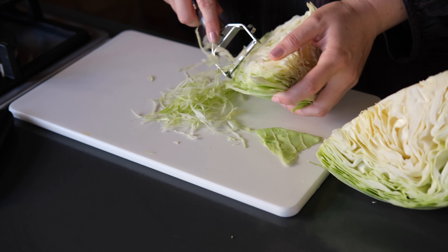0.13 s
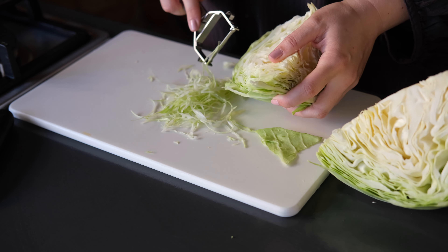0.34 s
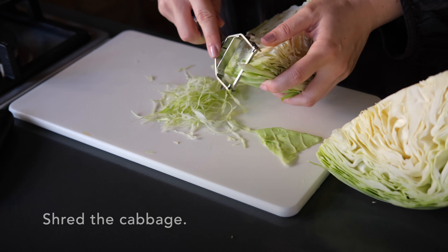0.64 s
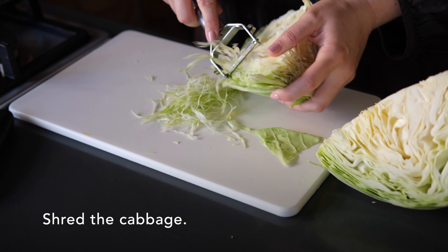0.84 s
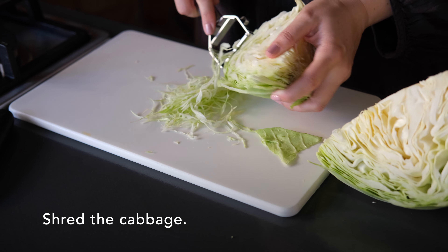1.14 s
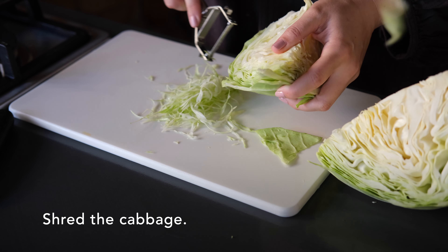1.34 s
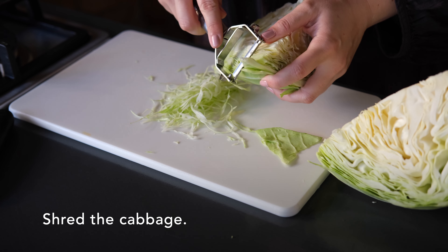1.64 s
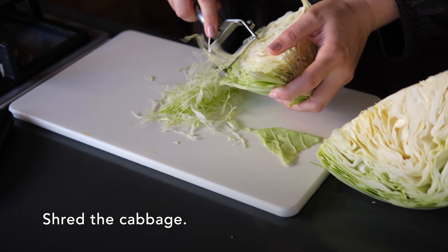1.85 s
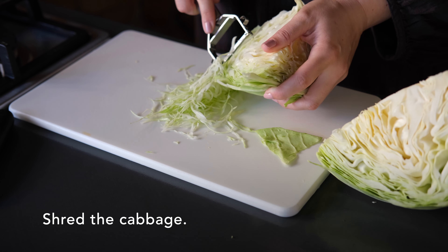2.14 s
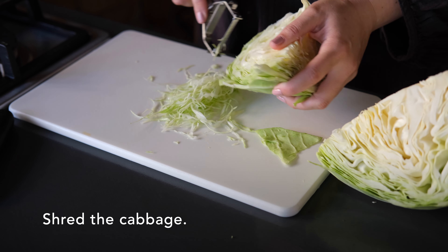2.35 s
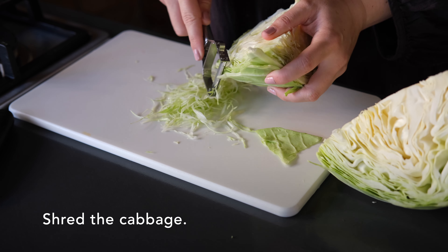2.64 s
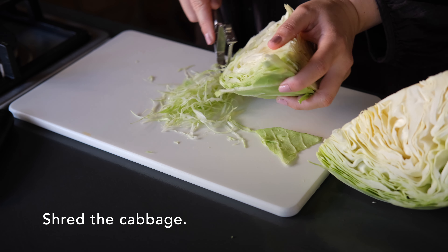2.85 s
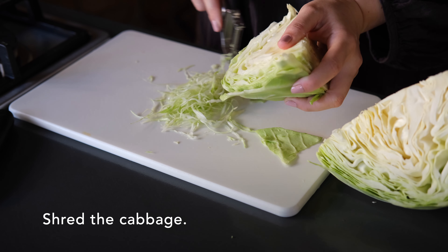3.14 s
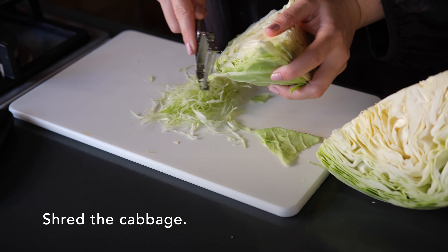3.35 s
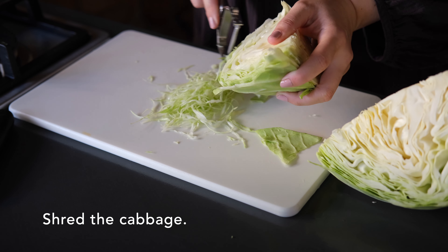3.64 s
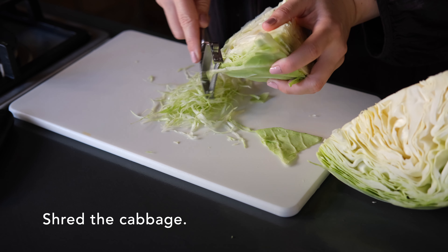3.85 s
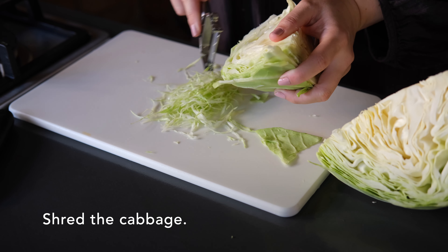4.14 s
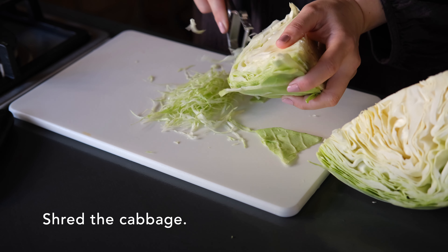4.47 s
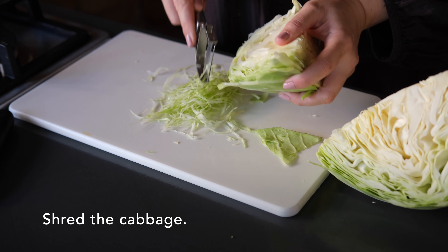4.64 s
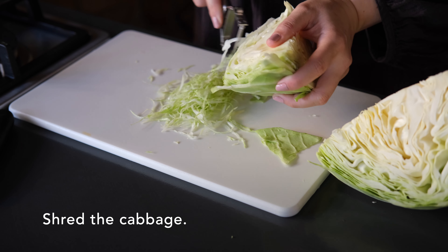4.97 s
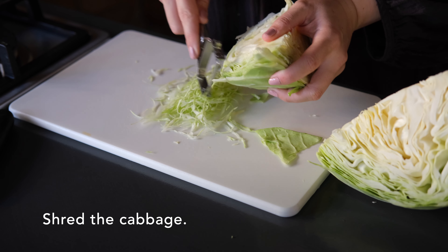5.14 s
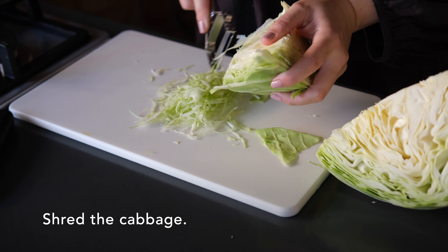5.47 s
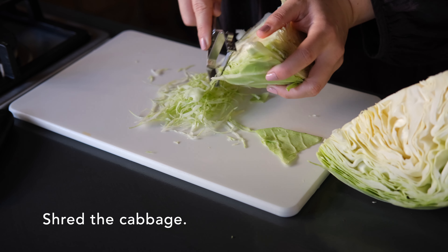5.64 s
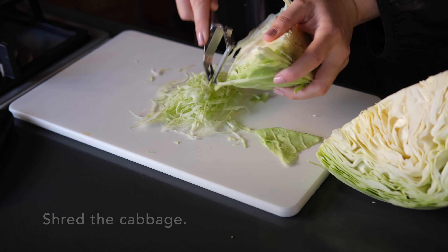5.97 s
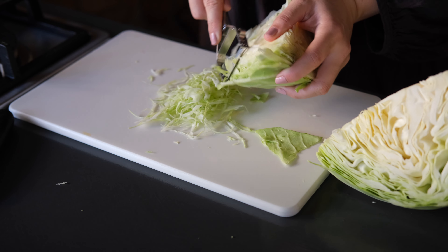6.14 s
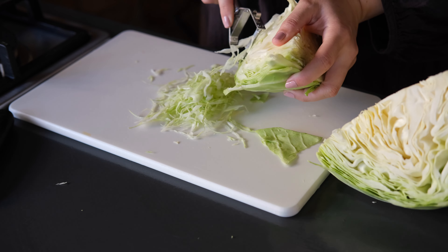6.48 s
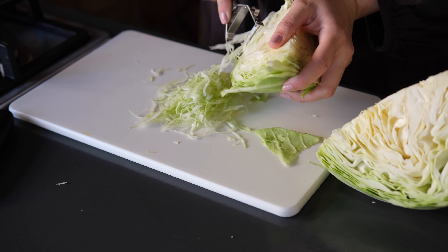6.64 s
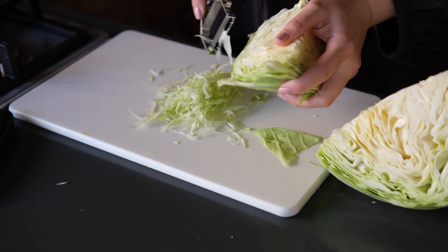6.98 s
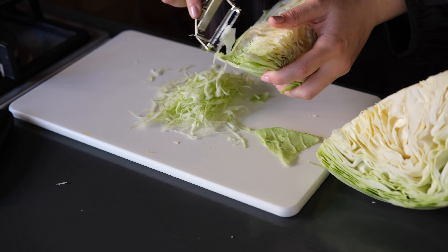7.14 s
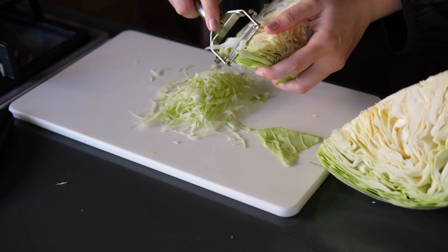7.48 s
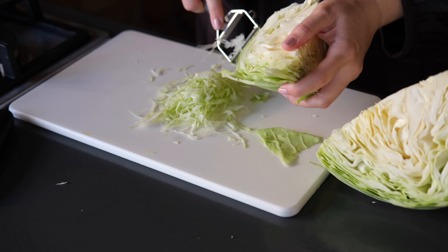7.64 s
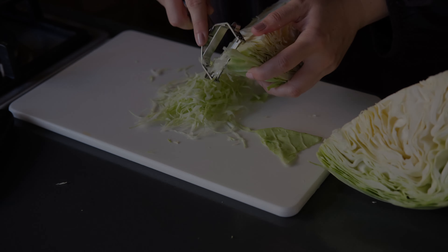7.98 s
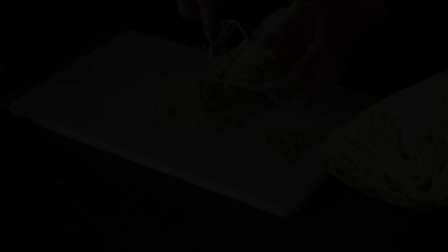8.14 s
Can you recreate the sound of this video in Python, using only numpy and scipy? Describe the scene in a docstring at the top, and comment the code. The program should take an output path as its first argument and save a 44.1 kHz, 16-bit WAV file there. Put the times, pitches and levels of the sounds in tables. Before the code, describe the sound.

A metal peeler rasps down a crisp cabbage wedge in repeated strokes, its loose blade clacking brightly and leaf ribs snapping, in a quiet kitchen.

```python
"""Shaving a cabbage with a peeler

In a quiet kitchen a metal peeler shaves a cabbage wedge, stroke after stroke: random tiny cracks drive
the crunch of the leaves, the ring of the blade and a fine fizz. Leaf ribs snap as short noisy notes, and
the loose swivel blade clacks against its stops as bursts of contacts ringing damped modes. A low thump
opens the scene; far appliances hum as shaped noise and wavering sines, and sparse echoes give the room.
"""
import sys
import numpy as np
from scipy import signal
from scipy.io import wavfile
from scipy.ndimage import uniform_filter1d

SR = 44100
rng = np.random.default_rng(int(sys.argv[2]) if len(sys.argv) > 2 else 0)


def dump(signal):
    """Clip the signal to [-1, 1] and save it as 16-bit WAV at the path in sys.argv[1]."""
    limited = np.clip(np.atleast_2d(signal).T, -1, 1)
    pcm = np.round(limited * 32767).astype(np.int16)
    wavfile.write(sys.argv[1], SR, pcm)


N = 366471  # samples

# Strokes of the edge, and rustles under the fingers. Each row: start in seconds, rise in seconds,
# hold in seconds, easing time in seconds, pressure at the touch in dB against the full pressure,
# crunch at full pressure in dB, then blade ring, fizz and low body in dB over the crunch.
STROKE_ROWS = [(0.0, 0.2, 0.016, 0.099, -6, -35, -8.5, -1.5, -11),
               (0.661, 0.061, 0.04, 0.076, -13, -44, -1, 3, -13),
               (.79, 0.09, 0.036, 0.065, -9.5, -33.5, -11.5, -1, -16),
               (1.06, .02, 0.045, .04, -9, -73.5, -2, 8, -9),
               (1.139, 0.023, 0.059, 0.063, -19.5, -40, -4.5, 2, 0),
               (1.64, 0.14, .125, 0.076, -11.5, -36, -6.5, -2, -23),
               (1.97, .02, 0.043, .1, -5, -60.5, 2, -2, -2),
               (2.11, 0.06, .01, .03, -7.5, -50.5, -3, -2, -8),
               (2.196, .01, 0.04, 0.049, 8.5, -39.5, -3.5, -5.5, -2),
               (2.65, .03, 0.036, 0.059, -1, -59, 1.5, 2, -4),
               (2.748, 0.081, 0.056, .06, -6, -45, 3.5, -0.5, -0.5),
               (3.01, 0.049, 0.018, 0.071, -14.5, -38, -2.5, -6, -8.5),
               (3.44, 0.08, 0.059, 0.13, -16.5, -40.5, 1.5, -1, -3),
               (3.91, 0.081, 0.032, .12, -14, -38, 1.5, -4, -2.5),
               (4.34, 0.073, 0.019, 0.17, -15.5, -37.5, 0.5, -2, -6),
               (4.78, 0.088, 0.021, 0.2, -14.5, -37, 0.5, -1.5, -12),
               (5.215, 0.077, 0.013, 0.2, -12.5, -36.5, -1, -3, -8.5),
               (5.644, 0.098, 0.014, 0.13, -14, -33, -1, -3, -14),
               (5.96, 0.011, 0.032, .04, -4, -63, 6.5, 4, -11),
               (6.115, 0.089, 0.068, 0.081, -8, -36, -1, -2, -11),
               (6.63, 0.03, .01, .03, -8, -54.5, -5, -5, -9),
               (6.679, 0.015, 0.078, 0.078, 1, -46, 4.5, -1.5, -7),
               (6.95, 0.086, .03, 0.11, -8, -63.5, -9, -2, -9),
               (7.4, 0.048, .01, 0.056, -13.5, -37.5, 3, 1.5, -21),
               (7.549, 0.062, 0.011, 0.11, -10.5, -31.5, -5.5, -2, -16),
               (8.03, 0.17, 0.012, 0.14, -16.5, -34, -8, -3.5, -14)]
# Strikes of the tipping blade. Each row: start in seconds, peak of the low modes in dB,
# pitch of the low modes in Hz, upper modes in dB over the low ones, ring length as a factor.
CLACK_ROWS = [(0.267, -41, 2840, 10, 1), (0.6455, -19, 2970, -11, 0.64), (1.1634, -30.5, 2930, -5, 1.1),
              (1.6229, -18.5, 2650, -3.5, 0.91), (1.977, -39.5, 2930, 1, .78),
              (2.193, -25.5, 3040, -24, 0.47), (2.248, -28, 3120, -1, 0.97), (2.613, -46.5, 3120, 3, .8),
              (2.6313, -34.5, 3120, -5, 0.62), (2.642, -41, 3050, -1, .9), (2.7408, -41, 2640, 9.5, 0.29),
              (3.1003, -32.5, 3100, 0, 1.3), (3.2335, -36, 3060, -8, 2), (3.416, -40, 3050, -2, .8),
              (3.4248, -24, 3030, -1.5, 0.88), (3.639, -45, 2960, 10, 1.01),
              (3.682, -32.5, 2980, -0.5, 0.68), (3.808, -38, 2940, -13, 1.6), (3.895, -25, 3140, -1, 0.27),
              (4.087, -46, 2900, 5, 1.8), (4.117, -27, 3150, -5, 1.2), (4.146, -21, 3060, -4, 1.2),
              (4.321, -24, 2920, -6.5, 0.78), (4.542, -31.5, 3100, 2.5, 1), (4.55, -30.5, 3210, 0, 1.1),
              (4.677, -48.5, 2820, 4.5, 1.5), (4.763, -25, 3250, 0.5, 0.69), (4.998, -42.5, 2990, 7, 1.2),
              (5.0372, -27.5, 3230, -10, 1.1), (5.0502, -20, 3080, -1, 0.97), (5.208, -29, 3050, -1.5, .48),
              (5.431, -39, 2900, -11, 1.01), (5.47, -23.5, 2970, -5, 1.2), (5.5762, -37.5, 2950, -10, 0.93),
              (5.632, -24, 2980, -14.5, 1.2), (5.8909, -30.5, 2880, -0.5, 1.4),
              (5.903, -30.5, 3090, -14, .8), (6.04, -35, 3070, -11, 1.4), (6.069, -25, 3130, -17, 1.6),
              (6.3474, -47.5, 2880, 5.5, .89), (6.4528, -33, 3100, -20, .51), (6.6777, -32, 2840, -8, 0.59),
              (6.8281, -34, 3000, -2.5, 0.67), (6.982, -39, 2850, -10, 0.91),
              (7.3435, -38.5, 2960, -6, 1.01), (7.3526, -33.5, 2990, -12, 1.4), (7.397, -43, 2870, 4, 1.01),
              (7.5447, -32, 2770, -0.5, .77), (7.6874, -28.5, 3010, 1.5, 1.7),
              (8.0142, -22, 2700, -5, 0.64)]
# Leaf ribs that break, in a stroke or under the fingers. Each row: start in seconds, peak in dB, pitch in Hz.
SNAP_ROWS = [(0.168, -17, 2210), (0.176, -20, 2710), (1.224, -18.5, 3050), (1.35, -45, 2000),
             (1.409, -46, 1900), (1.9003, -20.5, 2120), (2.0178, -26, 1630), (2.0448, -37, 2520),
             (2.0553, -40, 1788), (2.088, -36, 2480), (2.122, -37, 2940), (2.1329, -26, 2130),
             (2.394, -41, 2450), (2.43, -44, 1460), (2.7246, -47, 3270), (2.749, -31, 2000),
             (2.905, -31, 3000), (3.0761, -18.5, 3120), (3.9487, -21.5, 1820), (4.0477, -14.5, 3080),
             (4.644, -46, 1530), (4.8875, -20, 1790), (5.358, -26, 2910), (6.203, -13, 2370),
             (6.2348, -22, 1950), (6.6293, -38, 2450), (6.645, -34.5, 2490), (6.6538, -32, 2000),
             (6.7979, -24.5, 3000), (6.943, -40.5, 1950), (7.021, -33, 2500), (7.033, -37, 1390),
             (7.063, -40, 2420), (7.078, -47, 2830), (7.256, -38.5, 3400), (7.281, -39.5, 4240),
             (7.415, -23, 2810), (7.941, -41.5, 3060), (8.072, -24.5, 1810)]
# Blade modes in a low, a middle and a high family. Each row: frequency in Hz, width in Hz, relative level in dB.
BLADE_FAMILIES = [
    [(2720, 440, -35.5), (2919, 82, 6), (3082, 172, 12), (3232, 130, -14.5)],
    [(3950, 140, 2.5), (4480, 160, 3), (4640, 140, -13.5), (4780, 160, 9.5)],
    [(6500, 170, -5.5), (7250, 180, -9), (8150, 440, -8.5), (9900, 620, -2.5), (10720, 130, -9.5),
     (11180, 1050, -9.5), (13200, 400, -8)],
]
# How strongly rubbing drives the low, middle and high family, in dB.
RUB_DRIVE_DB = [0, -11, -19]
# How strongly a strike drives the middle and the high family, in dB.
STRIKE_DRIVE_DB = [0.4, -0.5]
# Tone of the cracking leaf. Each row: frequency in Hz, relative density in dB per Hz.
LEAF_COLOUR = [(300, -22.5), (600, -12.5), (1000, -10), (1500, -6), (2200, -1), (2800, -5.5), (4000, -24),
               (6000, -29), (9000, -39.5)]
# Resonant hollows between the leaves. Each row: frequency in Hz, width in Hz, relative level in dB.
HOLLOW_MODES = [(1340, 23, 0), (1571, 86, 6.5), (1766, 53, 3.5), (2018, 45, -2), (2250, 110, -5),
                (2544, 180, 8.5)]
# Tone of the finest cracks. Each row: frequency in Hz, relative density in dB per Hz.
FIZZ_COLOUR = [(1500, -36.5), (3000, 2), (4500, 1.5), (6000, -3), (9000, -8), (12000, -7.5), (16000, -16)]
# Tone of the low body of the crunch. Each row: frequency in Hz, relative density in dB per Hz.
LOW_BODY_COLOUR = [(100, -49.5), (250, -8.5), (450, 2), (800, -9), (1500, -7)]
# Pressure response of crunch, blade ring, fizz and low body, in dB per dB.
PRESSURE_FOLLOW = [1.296, 1, 1.045, 1]
# Shiver of the loose blade on the leaf: crunch, blade ring, fizz and low body, in dB against the clack's level.
SHIVER_DB = [-33.5, -16.5, -22, -31]
# The opening thump, in one row: frequency in Hz, starting level in dB, time to fall by 60 dB in seconds.
THUMP_SWING = (44, -25.5, 0.14)
# Broad appliance noise. Each row: frequency in Hz, relative density in dB per Hz.
HUM_COLOUR = [(12, -15), (20, 2), (67, -4.5), (168, -12.5), (198, -15), (234, -11), (347, -14.5),
              (542, -18.5), (642, -19), (1120, -21.5), (2600, -23.5), (3740, -26.5), (16000, -40.5)]
# Narrow bands in that noise. Each row: centre in Hz, width in Hz, level in dB.
HUM_BANDS = [(199.9, 9.9, -66.5), (2564, 100, -68), (3030, 620, -68.5)]
# Stereo width of the noise. Each row: frequency in Hz, left-right likeness from -1 to 1.
HUM_LIKENESS = [(60, 0.51), (180, 0.55), (550, 0.68), (1650, 0.38), (4970, 0.065), (15000, 0.068)]
# Steady motor tones. Each row: frequency in Hz, level in dB.
MOTOR_TONES = [(86, -63), (348, -66), (586, -73), (635, -70), (733, -73.5)]
# Stereo width of the rasp and clacks. Each row: frequency in Hz, gain of the side signal in dB.
SIDE_GAIN = [(200, -46), (1000, -37), (2500, -7), (6000, -10.5), (9500, -3), (12000, -33)]
# Stereo balance. Each row: frequency in Hz, left over right in dB.
LEFT_OVER_RIGHT = [(60, 22), (180, 2), (550, -1), (1650, -3.5), (4970, 0.5), (15000, 0)]
# Echoes off the walls. Each row: frequency in Hz, level in dB, time to fall by 60 dB in seconds.
WALL_ECHOES = [(200, -63, 1), (1040, -4, 0.36), (2920, -11.5, 0.27), (8000, -4, 0.22), (12800, -12.5, 0.21)]

EASE_DB, EASE_BEND = -24.5, 1.51  # the pressure falls this far in the easing time, slowly at first
SHIVER_T60_S = 0.17
SPOT_DB = 3  # random spread of each mode's share: no two strikes land on the same spot
HUM_DB = -55.5  # the broad noise without its narrow bands
EDGE_HZ = 15800


def gain_of(db):
    """Turns decibels into an amplitude factor."""
    return 10 ** (np.asarray(db) / 20)


def evened(x):
    """Scales a signal to rms 1."""
    return x / np.sqrt(np.mean(x ** 2) + 1e-20)


def read(points, hz, column=1):
    """Interpolates a table column along a log-frequency axis."""
    points = np.array(points)
    return np.interp(np.log(hz + 1), np.log(points[:, 0] + 1), points[:, column])


def colour(x, points):
    """Shapes the spectrum with a causal filter whose phase follows from its log gain."""
    hz = abs(np.fft.fftfreq(4096, 1 / SR))
    log_gain = np.log(gain_of(read(points, hz)))
    response = np.exp(np.conj(signal.hilbert(log_gain)))
    taps = np.fft.ifft(response).real[:2048]
    return signal.oaconvolve(x, taps)[:len(x)]


def ring(x, modes):
    """Excites damped modes that each start from rest; a wider mode dies sooner."""
    t = np.arange(2048) / SR
    taps = sum(gain_of(db) * np.exp(-np.pi * width * t) * np.sin(2 * np.pi * hz * t)
               for hz, width, db in modes)
    return signal.oaconvolve(x, taps / abs(taps).max())[:len(x)]


def drift(per_s, depth_db):
    """Wanders as a random gain that dips further than it swells."""
    knots = rng.standard_normal(int(per_s * N / SR) + 2)
    knots = np.minimum(knots, 1.2)  # caps the swells
    places = np.linspace(0, len(knots) - 1, N)
    return gain_of(depth_db * np.interp(places, np.arange(len(knots)), knots))


def crackle(per_s, spread_db, clump_db, clump_s):
    """Scatters tiny cracks of random sign, a few of them large, that come in clumps."""
    size = gain_of(spread_db * np.minimum(rng.exponential(1, N), 4.2))
    sign = rng.choice([-1., 1.], N)
    happens = rng.random(N) < per_s / SR
    width = max(int(clump_s * SR), 2)
    clumps = uniform_filter1d(uniform_filter1d(rng.standard_normal(N), width), width)
    return size * sign * happens * gain_of(clump_db * evened(clumps))


def contacts(count, rise_s, last_s, scratch, scratch_s):
    """Gives each blow one short cluster of random contacts, then a faint scratching."""
    t = np.arange(2048) / SR
    onset = (1 - np.exp(-t / rise_s)) ** 2
    fall = np.exp(-t / last_s) + scratch * np.exp(-t / scratch_s)
    noise = np.diff(rng.standard_normal((count, 2049)))  # a light part moves no bass
    return noise * onset * fall


def add(mix, s, db, sound):
    """Mixes a sound in at a time in seconds, with the given peak level."""
    part = mix[round(s * SR):][:len(sound)]
    part += gain_of(db) * sound[:len(part)] / abs(sound).max()


def contact():
    """Levels of crunch, blade ring, fizz and low body, following the edge's pressure and the blade's shiver."""
    t = np.arange(0, N + 64, 32) / SR  # one point every 32 samples
    power = np.zeros((4, len(t)))
    for s, rise, hold, ease, touch_db, peak_db, *over_db in STROKE_ROWS:
        after = np.maximum(t - s - rise - hold, 0) / ease
        pressure_db = touch_db * np.clip(1 - (t - s) / rise, 0, 1) + EASE_DB * after ** EASE_BEND
        level_db = peak_db + np.c_[[0, *over_db]] + np.outer(PRESSURE_FOLLOW, pressure_db)
        power += gain_of(2 * level_db) * (t >= s)
    for s, db, *_ in CLACK_ROWS:
        shiver_db = db + np.c_[SHIVER_DB] - 60 * abs(t - s) / SHIVER_T60_S
        power += gain_of(2 * shiver_db) * (t >= s)
    level = np.repeat(np.sqrt(power), 32, 1)[:, :N]
    return uniform_filter1d(level, 130, 1)  # smooths the steps


def rasp():
    """The edge cracks leaf cells: the wedge crunches, the blade rings along, the finest cracks fizz."""
    catch_and_slip = drift(per_s=45, depth_db=1.5)
    crunch_level, blade_level, fizz_level, body_level = contact() * catch_and_slip

    cracks = crackle(per_s=2500, spread_db=2.5, clump_db=1.5, clump_s=0.0029)
    hollows = np.zeros(N)
    for hz, width, db in HOLLOW_MODES:
        open_and_shut = drift(per_s=30, depth_db=13.5)
        hollows += gain_of(db) * ring(cracks * open_and_shut, [(hz, width, db)])
    crunch = evened(evened(colour(cracks, LEAF_COLOUR)) + 0.6 * evened(hollows))
    body = evened(colour(cracks, LOW_BODY_COLOUR))

    chatter = crackle(per_s=1500, spread_db=2.5, clump_db=4.5, clump_s=0.0092)
    rubbed = [(hz, width, db + drive_db)
              for drive_db, modes in zip(RUB_DRIVE_DB, BLADE_FAMILIES) for hz, width, db in modes]
    steady_ring = ring(chatter[:3 * SR], rubbed).std()
    blade = ring(blade_level * chatter, rubbed) / steady_ring  # rings on after each push

    fine_cracks = crackle(per_s=7000, spread_db=3.0, clump_db=2.0, clump_s=0.0033)
    fizz = evened(colour(fine_cracks, FIZZ_COLOUR))
    return crunch_level * crunch + blade + fizz_level * fizz + body_level * body


def thump():
    """One low sine swing at the start, dying exponentially."""
    hz, db, t60 = THUMP_SWING
    t = np.arange(N) / SR
    return gain_of(np.maximum(db - 60 * t / t60, -200)) * np.sin(2 * np.pi * hz * t)


def hum():
    """Far appliances: patchy smooth noise with a few narrow bands, partly alike on both sides."""
    frames, hz = N // 1024 + 5, np.fft.rfftfreq(4096, 1 / SR)
    a, b, c, d, patches = rng.standard_normal((frames, 2049, 5)).T
    patches = evened(uniform_filter1d(uniform_filter1d(patches, 40, 0), 4, 1))  # in dB
    same = np.clip(read(HUM_LIKENESS, hz), -1, 1)[:, None]
    left = a + 1j * b
    right = same * left + np.sqrt(1 - same ** 2) * (c + 1j * d)
    noise = np.array([left, right]) * gain_of(patches)

    broad = gain_of(read(HUM_COLOUR, hz))
    broad *= gain_of(HUM_DB) / np.linalg.norm(broad)
    band_power = np.zeros(len(hz))
    for centre, width, db in HUM_BANDS:
        band = 1 / (1 + (2 * (hz - centre) / width) ** 2)
        band_power += (gain_of(db) * band / np.linalg.norm(band)) ** 2
    gain = np.sqrt(broad ** 2 + band_power)
    sound = signal.istft(noise * gain[:, None], nperseg=4096, noverlap=3072)[1][:, :N]
    return np.linalg.norm(gain) * evened(sound)


def tones():
    """Motor tones: sines whose level and pitch wander slowly."""
    out = np.zeros(N)
    for hz, db in MOTOR_TONES:
        level = gain_of(db) * drift(per_s=3.1, depth_db=2.0)
        pitch = hz * drift(per_s=6, depth_db=0.2)
        cycles = np.cumsum(pitch) / SR + rng.random()
        out += level * np.sin(2 * np.pi * cycles)
    return out


def snaps():
    """A breaking rib is a wide crack with a short note of its own."""
    out = np.zeros(N)
    blows = contacts(len(SNAP_ROWS), rise_s=.0003, last_s=0.00063, scratch=0.048, scratch_s=0.018)
    for (s, db, hz), blow in zip(SNAP_ROWS, blows):
        note = evened(ring(blow, [(hz, 450, 0), (1.34 * hz, 900, -6)]))
        add(out, s, db, note + 0.17 * evened(blow))
    return out


def clacks():
    """A strike rings three mode families; its row shifts the low pitches and shortens or stretches the ring."""
    out = np.zeros(N)
    blows = contacts(len(CLACK_ROWS), rise_s=0.0016, last_s=0.0013, scratch=0.065, scratch_s=0.0072)
    most_modes = max(map(len, BLADE_FAMILIES))
    spots = SPOT_DB * rng.standard_normal((len(CLACK_ROWS), 3, most_modes))
    reference_hz = BLADE_FAMILIES[0][2][0]  # the low mode that is tuned to the row's pitch
    for (s, db, hz, upper_db, length), blow, spot in zip(CLACK_ROWS, blows, spots):
        pitch_shift = [hz / reference_hz, 1, 1]
        families_db = [0, *np.add(upper_db, STRIKE_DRIVE_DB)]
        for family_db, factor, modes, shares in zip(families_db, pitch_shift, BLADE_FAMILIES, spot):
            struck = [(mode_hz * factor, width / np.clip(length, .3, 4), mode_db + share)
                      for (mode_hz, width, mode_db), share in zip(modes, shares)]
            add(out, s, db + family_db, ring(blow, struck))
        add(out, s, db + upper_db - 10.0, blow)  # the bare tick of metal on metal
        jolt = ring(blow, [(406, 900, 25.5), (1310, 150, -7.5)])
        add(out, s, db - 16.0, jolt)  # knocks the wedge
    return out


def echoes():
    """Sparse taps of random sign, other ones on each side, dying band by band."""
    taps = np.zeros((2, SR // 2))
    slots = np.arange(100, SR // 2 - 20, 20)  # one tap somewhere in every 20 samples
    places = slots + rng.integers(0, 20, (2, len(slots)))
    signs = rng.choice([-1., 1.], (2, len(slots)))
    np.put_along_axis(taps, places, signs, 1)
    hz, t, bands = signal.stft(taps, SR, nperseg=64)
    decay = gain_of(-60 * t / read(WALL_ECHOES, hz, column=2)[:, None])
    energy = (decay ** 2).sum(1, keepdims=True) * 32 / 20  # frame step over tap spacing
    decay *= gain_of(read(WALL_ECHOES, hz))[:, None] / np.sqrt(energy)
    return signal.istft(bands * decay, SR, nperseg=64)[1]


def kitchen(first, second):
    """Two independent takes on the blade's noise spread into mid and side; the walls send echoes of the mid."""
    mid = (first + second) / np.sqrt(2)
    side = colour(first - second, SIDE_GAIN) / np.sqrt(2)
    direct = []
    for sign in (1, -1):  # left, right
        balance = [(hz, sign * db / 2) for hz, db in LEFT_OVER_RIGHT]
        direct.append(colour(mid + sign * side, balance))
    return direct + signal.fftconvolve(mid[None], echoes(), axes=1)[:, :N]


def scene():
    """The work at the board in its room, over thump, hum and motor tones."""
    ribs = snaps() / np.sqrt(2)  # the same in both layers, so without a side signal
    first, second = [rasp() + clacks() + ribs for _ in range(2)]  # own random draws in each
    return kitchen(first, second) + thump() + hum() + tones()


def record(dry):
    """A steep linear-phase low-pass closes the top of the treble."""
    taps = signal.firwin(511, EDGE_HZ, window=("kaiser", 9), fs=SR)
    return signal.oaconvolve(dry, taps[None], "same")


dry = scene()
out = record(dry)
dump(out)
```